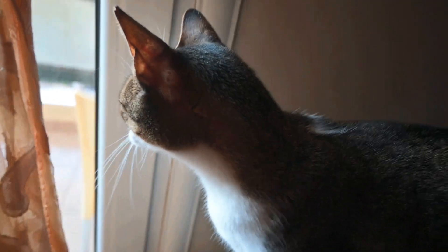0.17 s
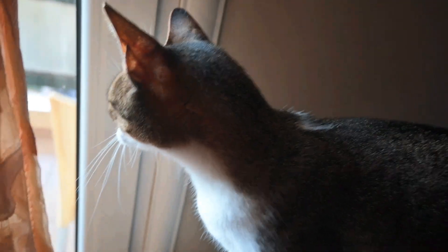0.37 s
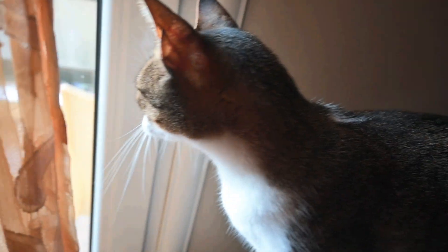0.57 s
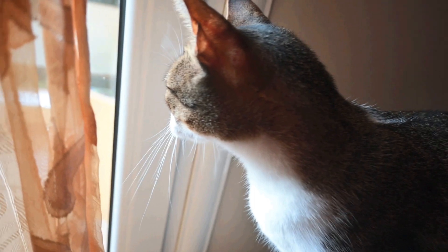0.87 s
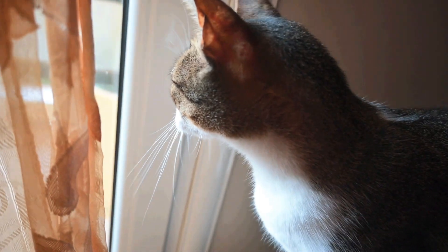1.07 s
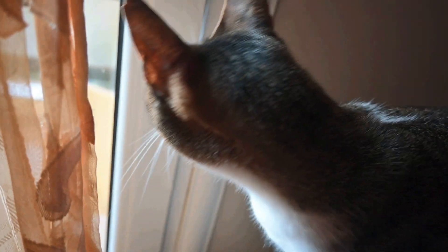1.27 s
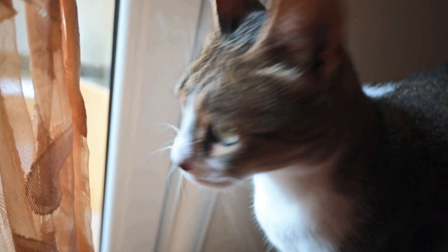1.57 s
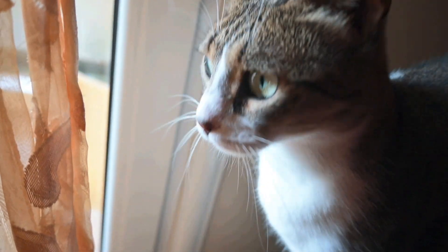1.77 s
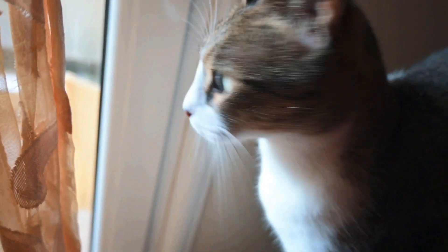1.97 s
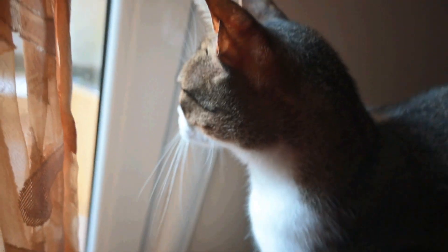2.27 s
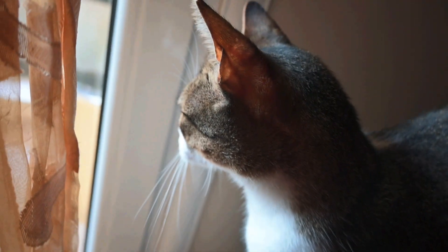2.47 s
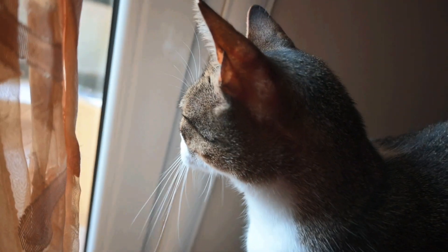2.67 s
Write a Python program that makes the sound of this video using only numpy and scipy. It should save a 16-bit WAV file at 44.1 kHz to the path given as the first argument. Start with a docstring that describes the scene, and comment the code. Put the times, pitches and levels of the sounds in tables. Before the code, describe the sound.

A cat gives one short, closed-mouth fluttering trill in a quiet room with faint hum.

```python
"""A cat's short trill

A cat gives one short closed-mouth trill, with one mouth click, beside a glass door in a quiet room.
Its pitch flutters quickly between a low and a high register: a wave and its overtones, plus puffs of rasp.
Ticks and a tap are short cracks of noise, the tap with ringing tones; rustles are swells of grainy noise.
Below lie wavering low hum tones, a hiss of filtered noise, and the rumble and bump of a hand-held camera."""
import sys
import numpy as np
from scipy import signal
from scipy.fft import rfft, irfft
from scipy.io import wavfile

SR = 44100
rng = np.random.default_rng(int(sys.argv[2]) if len(sys.argv) > 2 else 0)


def wrap_up_sound(samples):
    """Save the sound to the file named by the first command line argument, as 16-bit audio."""
    columns = np.atleast_2d(samples).T
    # keep every value between -1 and 1, then stretch to whole-number steps
    tamed = np.clip(columns, -1, 1)
    steps = np.round(tamed * 32767).astype(np.int16)
    wavfile.write(sys.argv[1], SR, steps)


N = 123921  # length in samples
TIME = np.arange(N) / SR  # seconds


def amp(db):
    """Turns decibels into a gain."""
    return 10 ** (np.asarray(db) / 20)


def unit(x):
    """Scales a sound to an average (rms) level of 1."""
    return x / np.sqrt(np.mean(x ** 2) + 1e-20)


def at_hz(points, hz):
    """Reads a table of frequency and value, with frequency on a log scale."""
    f, value = np.transpose(points)
    return np.interp(np.log(hz + 1), np.log(f + 1), value)


def curve(points, axis=1):
    """Draws straight lines through one column of a timed table, one value per sample."""
    rows = np.array(points)
    return np.interp(TIME, rows[:, 0], rows[:, axis])


def bins(x):
    """Lists the frequencies in the spectrum of x, in Hz."""
    return np.fft.rfftfreq(x.shape[-1], 1 / SR)


def shaped(gain):
    """Makes noise of rms 1 whose spectrum follows gain(hz)."""
    spectrum = rfft(rng.standard_normal(N)) * gain(bins(TIME))
    return unit(irfft(spectrum, N))


def wobble(hz):
    """Makes a random wavering of rms 1, mostly slower than hz."""
    return shaped(lambda f: 1 / (1 + (f / hz) ** 4))


def colour(x, points, tilt_db=0, size=2048):
    """Filters x to a spectrum in dB, plus a tilt per octave; the filter never rings ahead of the sound."""
    hz = abs(np.fft.fftfreq(size, 1 / SR))
    octaves = np.log2(np.maximum(hz, 500) / 4000)  # the tilt turns about 4000 Hz, flat below 500 Hz
    log_gain = np.log(amp(at_hz(points, hz) + tilt_db * octaves))
    # minimum phase: the ringing comes as early as this spectrum allows
    ring = np.fft.ifft(np.exp(signal.hilbert(log_gain).conj())).real
    return signal.oaconvolve(x, ring)[:len(x)]


def add(mix, s, sound):
    """Mixes a sound in, starting at s seconds."""
    part = mix[max(round(s * SR), 0):][:len(sound)]
    part += sound[:len(part)]


# Spectrum of the room tone and hiss. Each row: frequency in Hz, relative level in dB per Hz.
AIR_SPECTRUM = [(12, -28), (20, -2.5), (32, -1.5), (44, -23.5), (70, -7.5), (98, -15.5), (129, -11),
                (180, -10.5), (219, -11.5), (298, -18), (324, -18), (534, -25.5), (614, -24), (667, -26),
                (725, -25.5), (2330, -33.5), (15500, -38)]
# How alike left and right are. Each row: frequency in Hz, likeness from 0 (separate) to 1 (the same).
LEFT_RIGHT_LIKENESS = [(40, .9999), (130, 1), (290, 0.99), (640, 0.9), (1410, 0.84), (3100, 0.34),
                       (6820, 0.12), (15000, 0.27)]
# Slow changes in the middle of the room tone. Each row: time in seconds, boost at its centre in dB.
AIR_MIDDLE_LEVEL = [(0, 1.5), (.3, 2), (.45, 0), (.7, 2), (1.1, 0), (1.5, 1.5), (2.0, 0.5), (2.4, 1.5),
                    (2.81, -0.5)]
AIR_DB = -52.5
AIR_MIDDLE_HZ, AIR_MIDDLE_OCTAVES = 1050, 2.6  # centre and spread of the changing middle


def air():
    """Room tone: shared noise makes the bass alike on both sides, separate noise makes the treble differ."""
    hz = bins(TIME)
    shared, *sides = rfft(rng.standard_normal((3, N))) * amp(at_hz(AIR_SPECTRUM, hz))
    likeness = np.clip(at_hz(LEFT_RIGHT_LIKENESS, hz), 0, 1)
    stereo = np.sqrt(likeness) * shared + np.sqrt(1 - likeness) * np.array(sides)
    tone = unit(irfft(stereo, N))
    octaves_away = np.log2((hz + 1) / AIR_MIDDLE_HZ)
    middle_gain = np.exp(-(octaves_away / AIR_MIDDLE_OCTAVES) ** 2 / 2)
    middle = irfft(rfft(tone) * middle_gain, N)
    return amp(AIR_DB) * (tone + middle * (amp(curve(AIR_MIDDLE_LEVEL)) - 1))


# Low hum of the house. Each row: pitch in Hz, width of its wander in Hz, level in dB before swells.
HUM_TONES = [(138.34, 1.4, -56), (225.4, 12.13, -59), (320, 4.2, -67), (268.6, 6.4, -68), (73, 8.3, -72)]
# Swells of the first two tones. Each row: time in seconds, first tone's change in dB, second tone's in dB.
HUM_SWELLS = [(0, -4.5, -8), (.36, 2, 2), (.62, -4, -9.5), (.85, -0.5, 6.5), (1.02, -13, -2),
              (1.35, 3.5, -0.5), (1.6, 1.5, -7), (1.75, -6, 4), (1.88, 6.5, 3), (2.2, -7.5, -1),
              (2.45, 1.5, -1), (2.81, 2, -1.5)]


def hum():
    """A few low tones that waver in pitch and level; the two strongest also swell and fade."""
    swells = [curve(HUM_SWELLS, axis=1), curve(HUM_SWELLS, axis=2)] + [0] * (len(HUM_TONES) - 2)
    out = np.zeros(N)
    for (hz, width, db), swell_db in zip(HUM_TONES, swells):
        turns = np.cumsum(hz + width / 2 * wobble(hz=13.84)) / SR
        level_db = db + swell_db + 0.94 * wobble(hz=2.6)
        out += amp(level_db) * unit(np.sin(2 * np.pi * turns))
    return out


# Rumble of the hand-held camera. Each row: time in seconds, level in dB.
RUMBLE_LEVEL = [(0, -47), (.13, -50), (.2, -49.5), (.42, -45), (.55, -47.5), (.9, -54), (1.35, -56),
                (1.5, -56), (1.75, -69), (1.92, -54), (2.1, -50.5), (2.81, -75)]
# Spectrum of the rumble. Each row: frequency in Hz, relative level in dB before a softening near 400 Hz.
RUMBLE_SPECTRUM = [(5, -11.5), (18, 9.5), (32, -24), (55, -10), (100, -24.5), (300, -26.5)]
BUMP_S, BUMP_HZ, BUMP_LENGTH_S, BUMP_DB = 0.122, 50.7, 0.0092, -37


def handling():
    """The hand on the camera: low noise, and one soft bump as a low wave that swells and dies."""
    t = TIME - BUMP_S
    bump = amp(BUMP_DB) * np.cos(2 * np.pi * BUMP_HZ * t) * np.exp(-abs(t) / BUMP_LENGTH_S)
    rumble = shaped(lambda f: amp(at_hz(RUMBLE_SPECTRUM, f)) / (1 + (f / 400) ** 2))
    return bump + amp(curve(RUMBLE_LEVEL)) * rumble


# Soft rustles of movement. Each row: centre in seconds, half length in seconds, level in dB.
RUSTLE_EVENTS = [(0.025, 0.016, -60.5), (0.1, 0.013, -63), (0.261, 0.0099, -62), (0.333, 0.13, -64),
                 (1.333, 0.013, -58.5), (1.438, 0.032, -62.5), (1.775, 0.0071, -53), (2.085, 0.0089, -56.5),
                 (2.133, .016, -62.5), (2.73, 0.04, -66)]
# Spectrum of the rustles. Each row: frequency in Hz, relative level in dB.
RUSTLE_SPECTRUM = [(200, -24), (1000, 7.5), (2000, 3.5), (3500, -7.5), (6500, -1.5), (10000, -6),
                   (15000, -28)]
RUSTLE_GRAIN_DB = 4  # rms unevenness


def rustles():
    """Friction: short smooth swells of noise whose level jitters quickly, which sounds grainy."""
    swell = sum(amp(db) * np.exp(-((TIME - s) / length) ** 2 / 2) for s, length, db in RUSTLE_EVENTS)
    grains = rng.standard_normal(N) * amp(RUSTLE_GRAIN_DB * wobble(hz=403))
    return swell * unit(colour(grains, RUSTLE_SPECTRUM))


# Sharp ticks of movement. Each row: start in seconds, level in dB before TICK_DB and the filter,
# decay in seconds, treble tilt in dB per octave.
TICK_EVENTS = [(0.0368, -41, 0.00076, 5), (0.1126, -37.5, 0.0008, 7), (0.1204, -46.5, 0.001, -7),
               (0.1421, -43.5, 0.0015, 3), (1.3254, -48, 0.002, 3), (1.3369, -40.5, 0.0013, -0.5),
               (1.6053, -44, 0.00056, 6.5), (2.1384, -44, 0.0013, 1.5), (2.7152, -51, 0.0012, -3.5),
               (2.7551, -50, 0.0013, 4)]
# What the ticks ring with. Each row: frequency in Hz, gain in dB.
TICK_SPECTRUM = [(300, -0.5), (1000, -5), (2000, 1), (2700, 6), (2950, 6), (3300, 1.5), (4300, -4),
                 (5000, -1), (5700, -0.5), (7000, -2), (8500, -12), (9500, -11), (15000, -18)]
TICK_DB, TICK_TAIL_DB, TICK_TAIL_S = -4, -8, 0.019


def ticks(size=4096):
    """Each tick is a brief crack of noise with a fainter, longer rattle behind it."""
    out, t = np.zeros(N), np.arange(size) / SR
    for s, db, decay, tilt_db in TICK_EVENTS:
        fade = np.exp(-t / decay) + amp(TICK_TAIL_DB) * np.exp(-t / TICK_TAIL_S)
        tick = colour(fade * rng.standard_normal(size), TICK_SPECTRUM, tilt_db)
        add(out, s, amp(TICK_DB + db) * tick)
    return out


# Ringing tones of the tap. Each row: pitch in Hz, level in dB before TAP_DB, time to fall 60 dB in seconds.
TAP_TONES = [(1510, -13, 0.076), (2510, -11, 0.036), (2890, -0.5, 0.032), (4070, -17, 0.033),
             (4320, -10, 0.038), (5600, -1, 0.032), (5850, -5, 0.0098), (6960, -7, 0.024),
             (6900, -11, .025)]
# Spectrum of the tap's crack. Each row: frequency in Hz, gain in dB.
TAP_SPECTRUM = [(300, -22), (1500, -12), (3000, -2), (4500, 5.5), (6000, 9), (8400, 2), (9500, -21),
                (15000, -22)]
TAP_S, TAP_DB = 1.4066, -42
TAP_CRACK_DB, TAP_CRACK_S = -39, 0.003


def tap(size=8192):
    """A bright crack of noise and a few ringing tones that die quickly."""
    out, t = np.zeros(N), np.arange(size) / SR
    ring = sum(amp(db) * 10 ** (-3 * t / t60) * np.sin(2 * np.pi * hz * t) for hz, db, t60 in TAP_TONES)
    crack = colour(np.exp(-t / TAP_CRACK_S) * rng.standard_normal(size), TAP_SPECTRUM)
    add(out, TAP_S, amp(TAP_DB) * ring + amp(TAP_CRACK_DB) * crack)
    return out


# The trill. Each row: time in seconds, pitch in Hz before jitter, level in dB before VOICE_DB,
# shimmer and the throat.
TRILL_PATH = [(1.585, 560, -52), (1.590, 580, -36.5), (1.596, 605, -39), (1.600, 600, -47),
              (1.605, 555, -34), (1.611, 545, -33), (1.619, 540, -58), (1.624, 525, -33), (1.631, 490, -34),
              (1.636, 410, -39), (1.644, 400, -32), (1.656, 365, -35.5), (1.667, 455, -28),
              (1.674, 410, -34), (1.689, 475, -28), (1.695, 440, -32), (1.699, 380, -42), (1.703, 360, -32),
              (1.711, 385, -38), (1.719, 595, -31.5), (1.729, 565, -31), (1.734, 375, -44),
              (1.745, 385, -38), (1.751, 575, -31), (1.761, 600, -38), (1.770, 570, -32), (1.777, 520, -48),
              (1.785, 500, -62)]
# Throat and nose with the mouth closed. Each row: frequency in Hz, gain in dB.
THROAT_SPECTRUM = [(200, -9.5), (380, -1), (560, -3), (780, -16.5), (925, -9), (1050, -9.5), (1215, -7),
                   (1520, -21), (1900, -15), (2400, -28.5), (3100, -33.5), (4000, -25.5), (4900, -42),
                   (6000, -41.5), (10000, -42), (15000, -62)]
# Overtones and rasp against the fundamental. Each row: time in seconds, gain in dB.
OVERTONE_LEVEL = [(1.59, -11), (1.602, 3), (1.612, -5), (1.63, -1.5), (1.68, -2), (1.72, 0), (1.750, 0),
                  (1.761, 3), (1.772, -7)]
VOICE_DB, SHIMMER_DB = 1, 2.1  # overall gain, rms unsteadiness of level
JITTER, JITTER_HZ = 0.027, 205  # rms unsteadiness of pitch (a fraction), rate of jitter and shimmer
RASP_DB, RASP_CORNER_HZ, PUFF_CYCLES = -10, 885, 0.65
# The high register is purer: above this pitch, overtones fall off faster
LOW_REGISTER_HZ, PURITY_DB = 434, -15  # dB per octave of overtone, per octave of pitch


def trill(count=28):
    """Fluttering vocal pulses, with a puff of rasp in each cycle, pass through the closed throat."""
    hz = curve(TRILL_PATH) * (1 + JITTER * wobble(JITTER_HZ))
    sounding = (TIME > TRILL_PATH[0][0]) & (TIME < TRILL_PATH[-1][0])
    turns = np.cumsum(hz * sounding) / SR
    octaves_up = np.maximum(np.log2(curve(TRILL_PATH) / LOW_REGISTER_HZ), 0)
    slope_db = PURITY_DB * octaves_up
    overtones = sum(amp(slope_db * np.log2(k / 2)) * np.sin(2 * np.pi * k * turns) for k in range(2, count))
    breath = shaped(lambda f: f ** 2 / (f ** 2 + RASP_CORNER_HZ ** 2))
    puffs = unit(np.exp(-(turns % 1) / PUFF_CYCLES)) * breath
    upper = overtones + amp(RASP_DB) * puffs * np.sqrt(SR / hz)
    folds = np.cos(2 * np.pi * turns) + amp(curve(OVERTONE_LEVEL)) * upper
    effort = amp(VOICE_DB + curve(TRILL_PATH, axis=2) + SHIMMER_DB * wobble(JITTER_HZ))
    return colour(folds * effort * sounding, THROAT_SPECTRUM)


# Spectrum of the mouth click. Each row: frequency in Hz, gain in dB.
CLICK_SPECTRUM = [(300, 1), (2000, -1), (3700, 6), (5500, -9), (9500, -7), (12000, -17), (15000, -26)]
CLICK_S, CLICK_DB = 1.7614, -21.5


def mouth_click(size=512):
    """A single sharp impulse from the mouth, filtered to its colour."""
    out = np.zeros(N)
    click = colour(signal.unit_impulse(size), CLICK_SPECTRUM)
    add(out, CLICK_S, amp(CLICK_DB) * click)
    return out


# How long the room rings. Each row: frequency in Hz, time to fall 60 dB in seconds.
ROOM_RING = [(150, 0.56), (420, 0.52), (610, 0.78), (800, 0.55), (1200, 0.26), (4000, 0.087),
             (12000, 0.084)]
ROOM_GAP_S = 0.0083  # silence before the tail, and then the length of its rise


def room(x, size=32768):
    """Many blurred reflections: a tail of fading noise whose treble dies first."""
    hz, t, z = signal.stft(rng.standard_normal(size), SR, nperseg=256)
    fade = 10 ** (-3 * t / at_hz(ROOM_RING, hz)[:, None])
    tail = signal.istft(z * fade, SR)[1]
    tail *= np.clip(np.arange(len(tail)) / SR / ROOM_GAP_S - 1, 0, 1)
    response = abs(rfft(tail))[bins(tail) < 1500]  # the gain is set to rms 1 below 1500 Hz
    return signal.fftconvolve(x, tail)[:N] / np.sqrt(np.mean(response ** 2))


# Echoes of the cat from door and wall. Each row: delay in seconds, level in dB.
DOOR_AND_WALL = [(.0048, -35), (0.0105, -25)]
VOICE_ROOM_DB, TICK_ROOM_DB = -12, -2.5  # how much of the cat and of the small noises feeds the room


def scene():
    """The cat and the small noises in the room, over the background."""
    background = air() + hum() + handling()
    small = rustles() + ticks() + tap()
    cat = trill() + mouth_click()
    near = sum(amp(db) * np.interp(TIME - delay, TIME, cat) for delay, db in DOOR_AND_WALL)
    far = room(amp(VOICE_ROOM_DB) * cat + amp(TICK_ROOM_DB) * small)
    return cat + near + small + far + background


def record(dry):
    """The recorder's band limit: a steep filter removes the highest treble."""
    edge_hz = 15740
    band_limit = signal.firwin(1023, edge_hz, window=("kaiser", 9), fs=SR)
    return signal.oaconvolve(dry, band_limit[None], "same")


dry = scene()
out = record(dry)
wrap_up_sound(out)
```